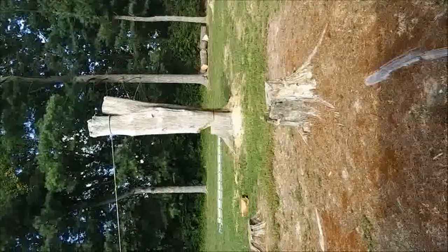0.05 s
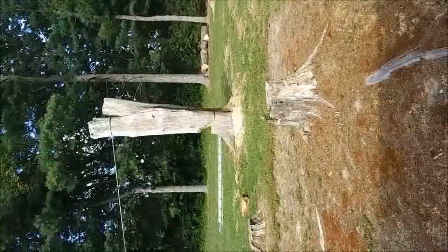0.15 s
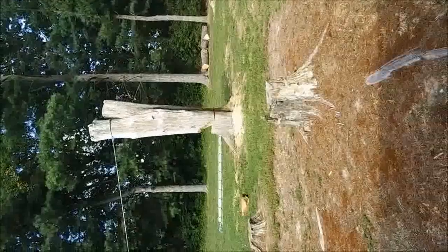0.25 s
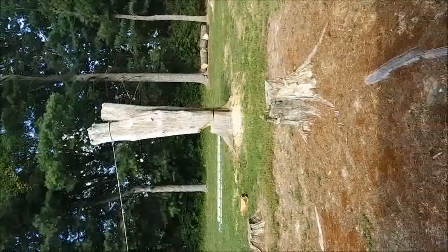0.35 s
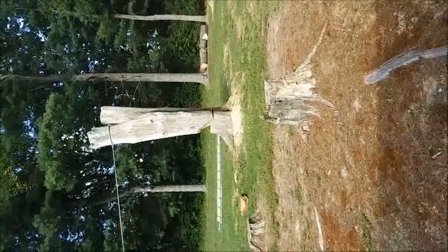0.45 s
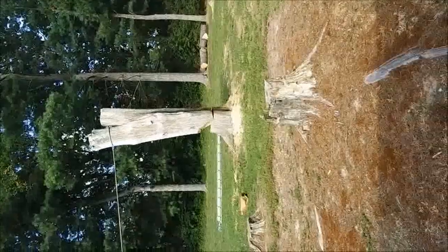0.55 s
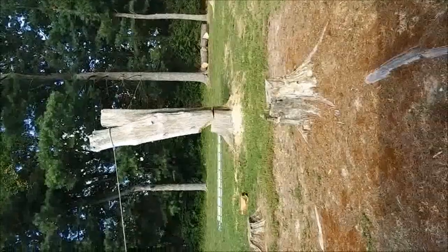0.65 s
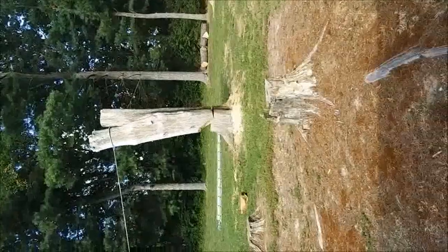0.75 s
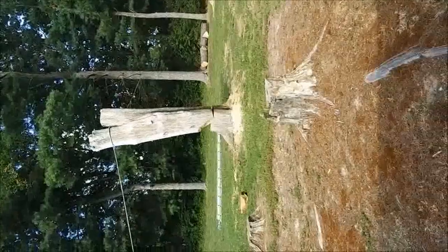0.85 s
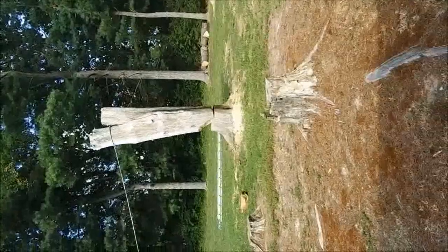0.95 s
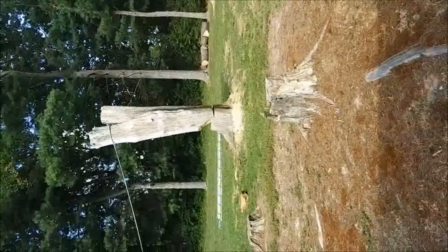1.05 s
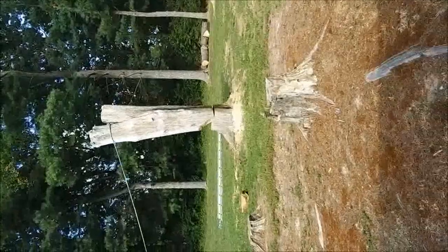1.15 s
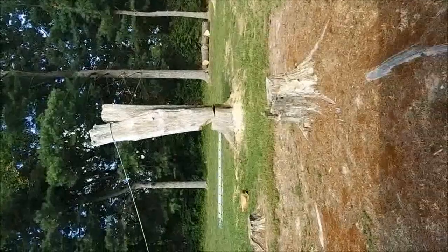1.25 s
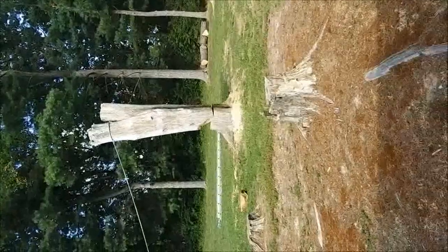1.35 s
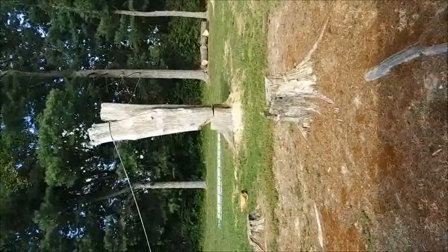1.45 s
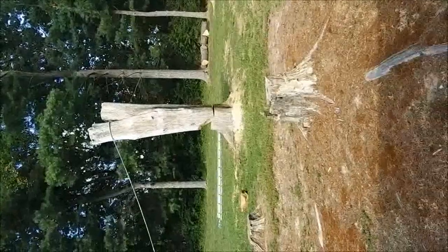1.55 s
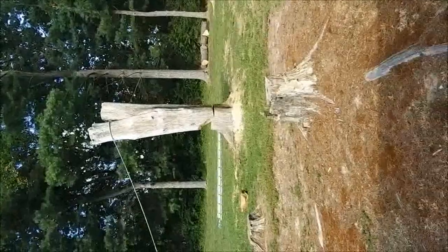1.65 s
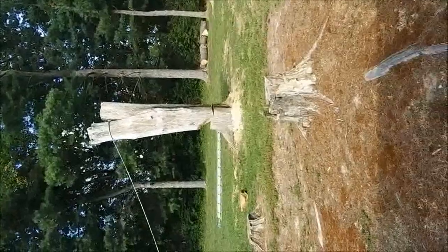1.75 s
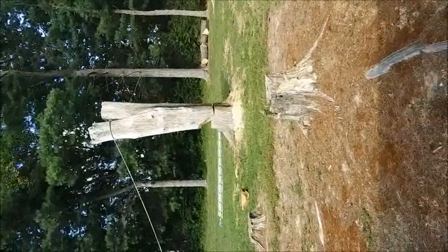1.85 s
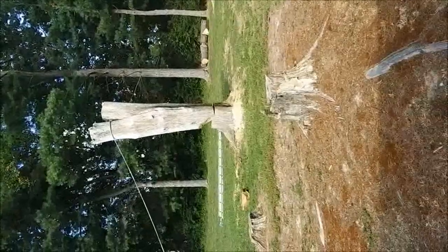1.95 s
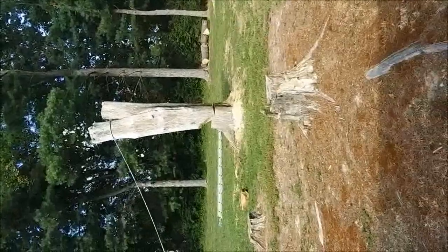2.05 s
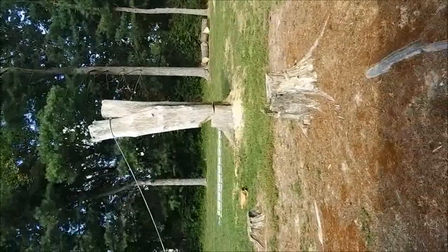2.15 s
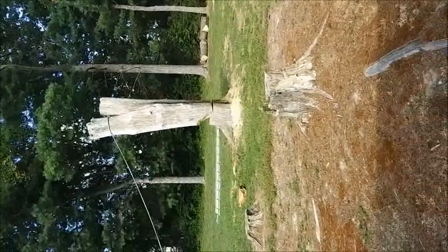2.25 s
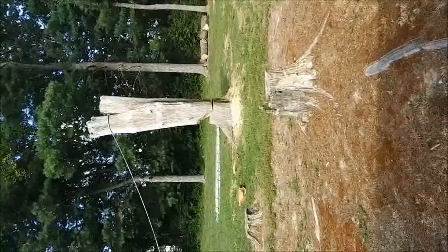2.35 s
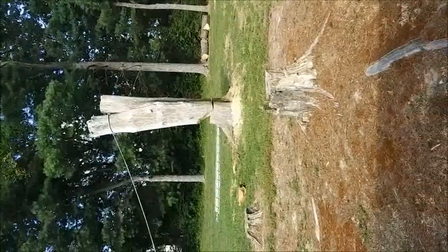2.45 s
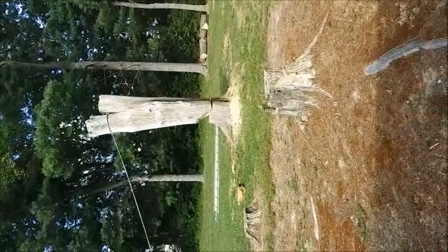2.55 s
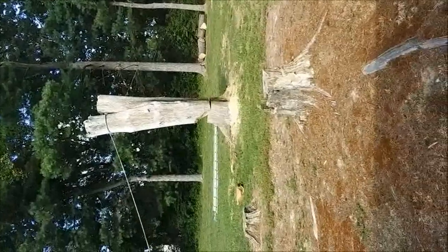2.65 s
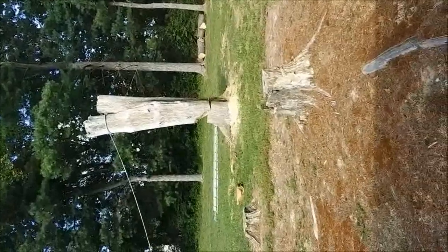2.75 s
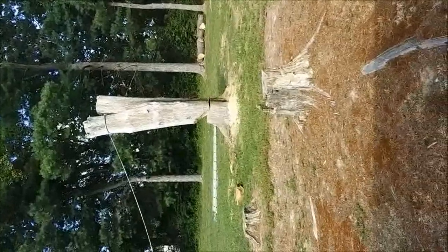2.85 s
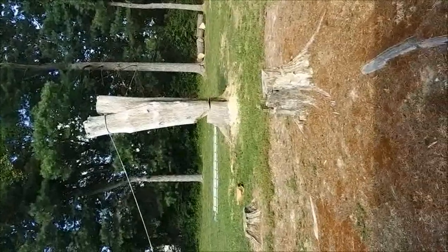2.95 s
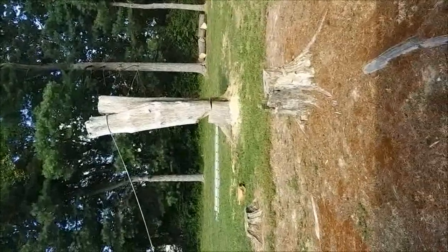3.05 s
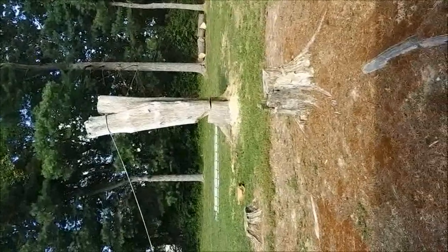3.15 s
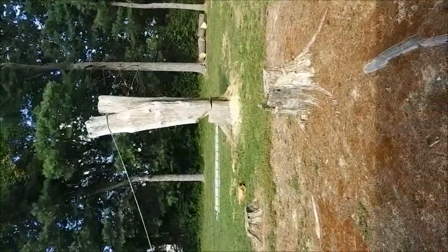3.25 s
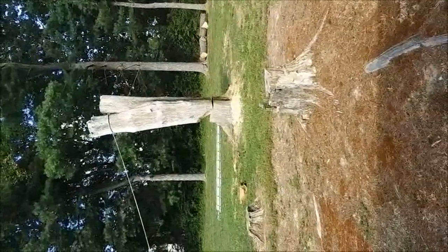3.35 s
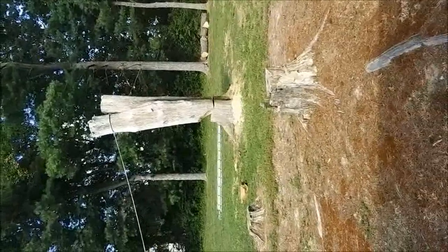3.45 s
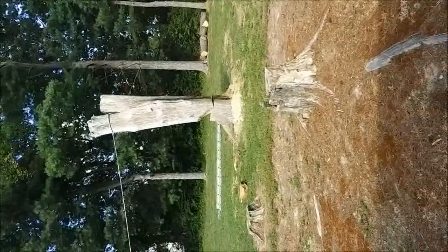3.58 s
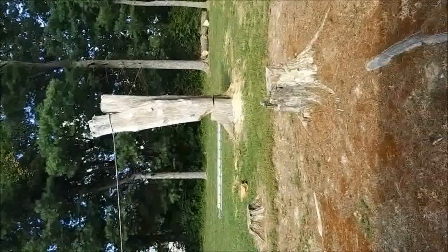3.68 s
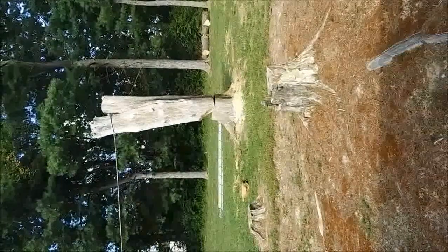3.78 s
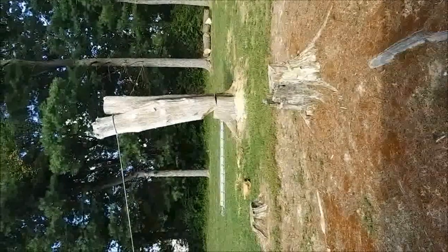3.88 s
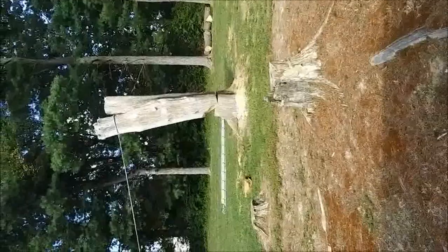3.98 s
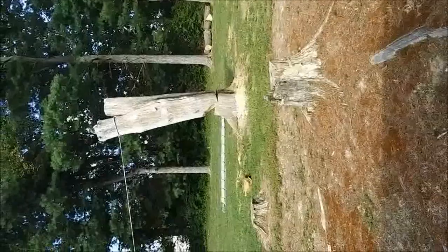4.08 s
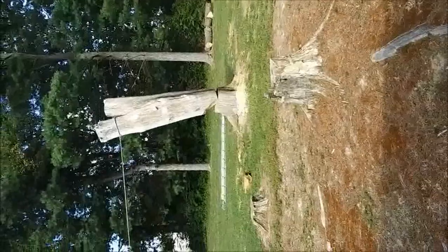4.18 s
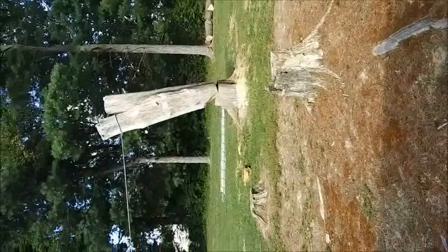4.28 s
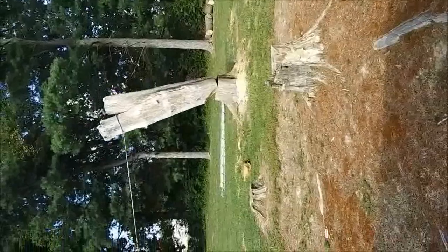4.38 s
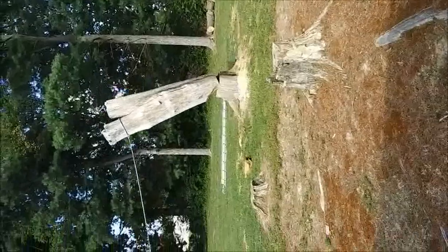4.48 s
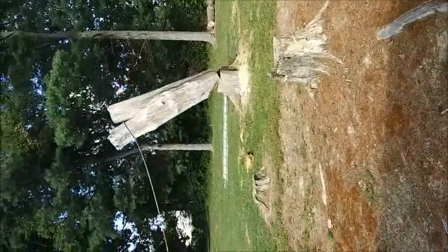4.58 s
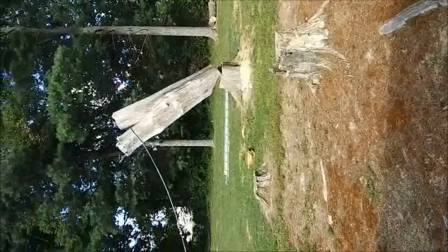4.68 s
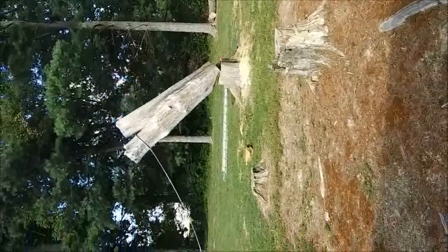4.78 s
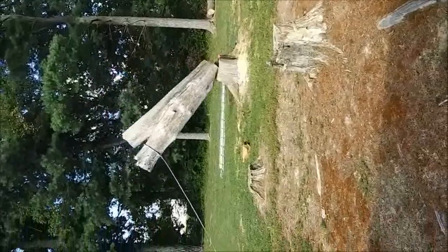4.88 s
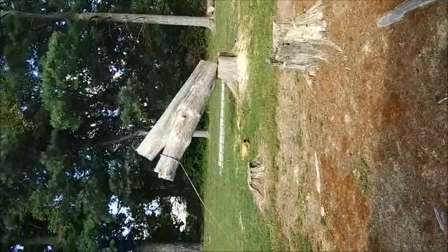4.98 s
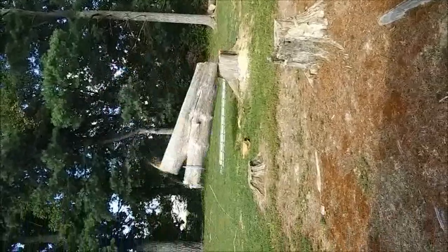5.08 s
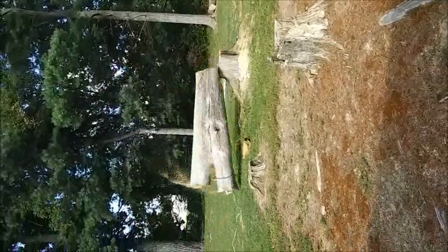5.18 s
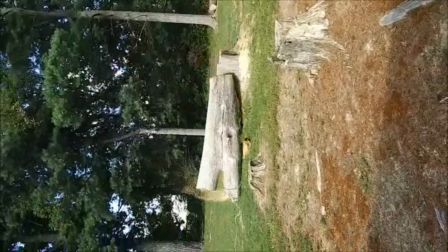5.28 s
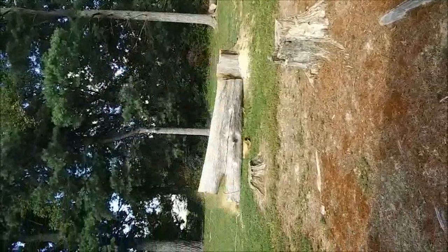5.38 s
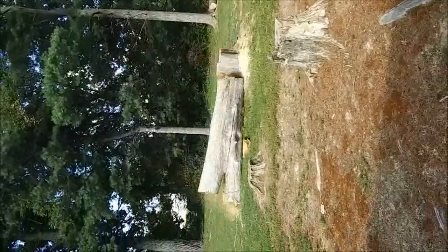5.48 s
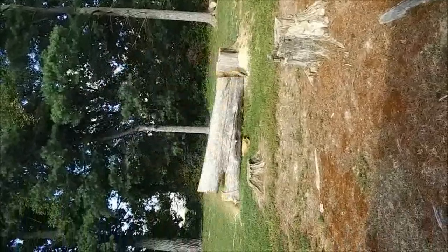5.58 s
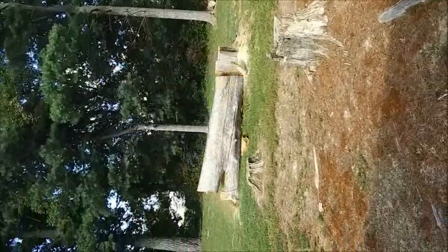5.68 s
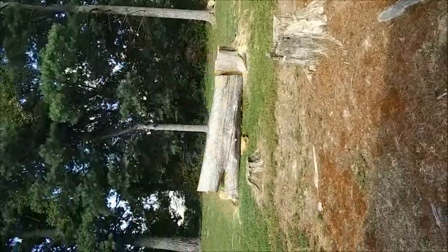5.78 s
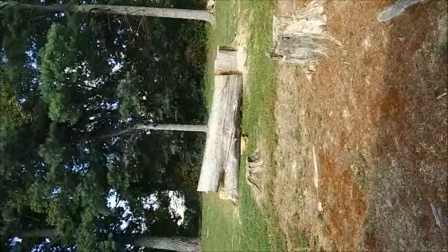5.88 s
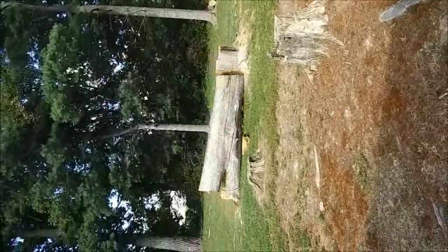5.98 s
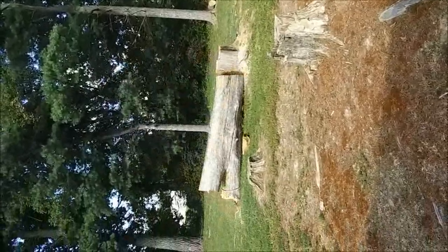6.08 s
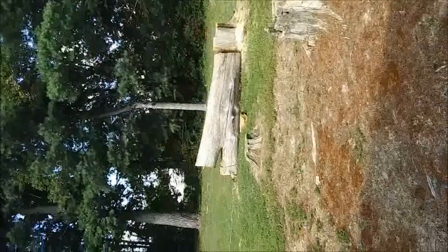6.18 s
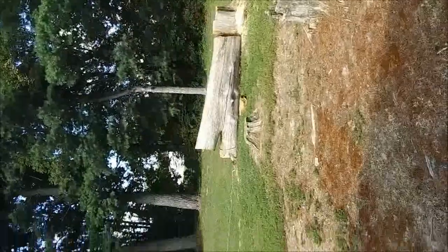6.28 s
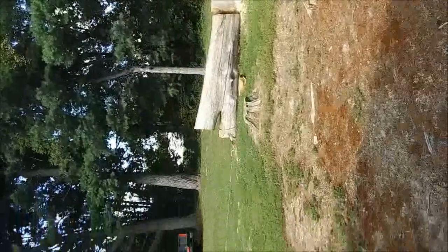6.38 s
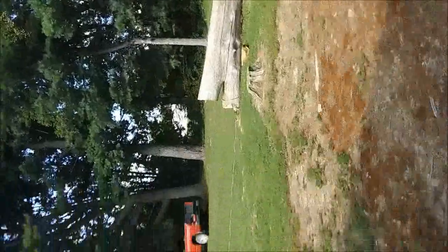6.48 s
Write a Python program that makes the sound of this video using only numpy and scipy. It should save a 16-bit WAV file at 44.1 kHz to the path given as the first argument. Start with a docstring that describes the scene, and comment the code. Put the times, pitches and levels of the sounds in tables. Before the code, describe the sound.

Faint ticks, a few sharp wood cracks, a pause, then a rapid run of splintering snaps as a trunk topples and thuds onto soil, echoing among trees.

```python
"""Hinge wood of a falling trunk

A topped trunk, cut at its foot and pulled by a rope, tears its hinge: ticks, a few loud cracks, a pause,
then a run of splintering snaps as it topples and lands with two main thuds among weaker contacts.
Breaks are short pulses and noise bursts that excite damped trunk modes; each thud rings the log and
crushes soil. Ground and trees echo them by filtered noise; engine, leaves and insects are shaped noise."""
import sys
import numpy as np
from scipy import signal
from scipy.fft import rfft, irfft, next_fast_len
from scipy.io import wavfile
from scipy.ndimage import uniform_filter1d, minimum_filter1d, map_coordinates

SR = 44100
rng = np.random.default_rng(int(sys.argv[2]) if len(sys.argv) > 2 else 0)


def unload_audio(sound):
    """Save the sound as a 16-bit wav file, at the path given as the first command line argument."""
    columns = np.transpose(np.atleast_2d(sound))
    # keep every value between -1 and 1, then stretch to whole-number steps
    steps = np.round(np.clip(columns, -1, 1) * 32767)
    wavfile.write(sys.argv[1], SR, steps.astype(np.int16))


N = 287973

# Splintering of small fibres and debris. Each row: time in seconds, relative level in dB.
SPLINTERING = [(3.8, -62), (4.0, -63.5), (4.11, -46.5), (4.24, -52), (4.3, -50.5), (4.67, -50.5),
               (4.94, -45), (5.37, -56), (5.65, -86)]
MIDDLE_HZ = 2800  # middle snap pitch


def amp(db):
    """Level law: decibels to amplitude gain."""
    return 10 ** (np.asarray(db) / 20)


def unit(x):
    """Power normalization: scales a signal to rms 1."""
    return x / np.sqrt(np.mean(x ** 2) + 1e-20)


def along(points, hz, axis=1):
    """Logarithmic frequency scale: interpolates one column of a table whose first column is in Hz."""
    cols = np.transpose(points)
    return np.interp(np.log(hz + 1), np.log(cols[0] + 1), cols[axis])


def curves(rows):
    """Level envelopes: one value per sample for each column after the time."""
    s, *cols = np.transpose(rows)
    t = np.arange(N) / SR
    late_start = s[0] > 1  # such a curve is at -120 dB outside its times
    return [np.interp(t, s, c, left=-120 if late_start else c[0], right=-120 if late_start else c[-1])
            for c in cols]


def wobble(rate):
    """Slow random modulation: a smooth curve through `rate` random knots a second."""
    knots = rng.standard_normal(int(N * rate / SR) + 4)
    return map_coordinates(knots, [np.arange(N) * rate / SR])


def filtered(x, response):
    """Linear filtering: multiplies the spectrum by a complex response of frequency."""
    m = next_fast_len(len(x) + 8192)
    return irfft(rfft(x, m) * response(np.fft.rfftfreq(m, 1 / SR)), m)[:len(x)]


def peak(hz, width_hz):
    """Simple resonator: the causal response of a damped oscillator, with gain 1 at its centre."""
    return lambda f: 1j * f * width_hz / (hz * hz - f * f + 1j * f * width_hz)


def ring(modes, t, rise, spread_db):
    """Modal superposition: damped sines, with new strengths and slightly new pitches for each blow."""
    total = 0
    for hz, db, t60 in modes:
        decay = amp(db + rng.normal(0, spread_db) - 60 * t / t60)
        total = total + decay * np.sin(2 * np.pi * hz * rng.normal(1, 0.025) * t)
    return (1 - np.exp(-t / rise)) * total


def add(track, s, sound):
    """Linear superposition: adds a sound to the track at time s."""
    track[round(s * SR):][:len(sound)] += sound


def rush(spectrum, patchy_db):
    """Coloured noise: rms 1, with random gain in patches of time and frequency."""
    z = signal.stft(rng.standard_normal(N), nperseg=512)[2]
    over_frequency = uniform_filter1d(rng.standard_normal(z.shape), 6, 0)
    field = uniform_filter1d(over_frequency, 14, 1)
    noise = signal.istft(z * amp(patchy_db * unit(field)), nperseg=512)[1][:N]
    return unit(filtered(noise, lambda hz: amp(along(spectrum, hz))))


def engine():
    """Broadband drone: low coloured noise under a slowly wavering level."""
    # Each row: time in seconds, mean level in dB.
    engine_level = [(0, -53), (1.3, -51), (2.8, -51.5), (3.7, -46.5), (5.7, -48), (6.53, -50.5)]
    # Each row: frequency in Hz, relative spectrum level in dB.
    drone_spectrum = [(15, -58), (25, -33), (64, -8.5), (80, -2), (102, -4), (168, -1), (274, -2),
                      (500, -29), (650, -43), (1100, -120)]
    level_db = curves(engine_level)[0] + .6 * wobble(9)
    return amp(level_db) * rush(drone_spectrum, patchy_db=.6)


def leaves(level_db):
    """Incoherent rustle: patchy coloured noise under a slowly wavering level."""
    # Each row: frequency in Hz, relative spectrum level in dB.
    rustle_spectrum = [(210, -46), (350, -2.5), (568, -2), (2030, 0), (3240, -5), (4850, -18.5),
                       (7990, -21), (9690, -29), (15200, -31), (16500, -28)]
    return amp(level_db + 1.1 * wobble(6.5)) * rush(rustle_spectrum, patchy_db=1.55)


def insects(level_db):
    """Narrow-band noise: a resonant chorus, and one insect that chirps above it in pitch."""
    # Each row: centre in Hz, width in Hz of each of two cascaded resonances, relative gain in dB.
    chorus_bands = [(6400, 500, 3), (6910, 470, 6), (7830, 520, 8), (8140, 570, 3)]
    # Each row: centre time in seconds, half length in seconds (to 1/e), level in dB.
    chirp_times = [(0.297, .1, -78), (1.234, .09, -67), (2.2, 0.1, -72), (3.42, .11, -71),
                   (5.85, 0.035, -66.5), (6.178, .04, -69)]
    t = np.arange(N) / SR
    chorus = filtered(rng.standard_normal(N),
                      lambda f: sum(amp(db) * peak(c, w)(f) ** 2 for c, w, db in chorus_bands))
    envelope = sum(amp(db) * np.exp(-((t - s) / half) ** 4) for s, half, db in chirp_times)
    solo = unit(filtered(rng.standard_normal(N), lambda f: peak(8750, 450)(f) ** 2))
    return amp(level_db + 0.57 * wobble(20.0)) * unit(chorus) + envelope * solo


def background():
    """Incoherent addition: independent engine, leaf and insect noises."""
    # Each row: time in seconds, mean rustle level in dB, mean insect chorus level in dB.
    air_levels = [(0, -51, -65), (.6, -51.5, -65.5), (2, -50.5, -66.5), (3, -50.5, -69.5),
                  (3.8, -50.5, -64.5), (5.8, -50.2, -63.5), (6.15, -50.5, -66), (6.53, -54.5, -66)]
    rustle_db, insects_db = curves(air_levels)
    return engine() + leaves(rustle_db) + insects(insects_db)


def ground(x):
    """Diffuse reflection: the ground returns a blurred, duller, weaker copy a few milliseconds late."""
    t = np.arange(200) / SR
    blur = np.exp(-t / 0.0022) * rng.standard_normal(len(t)) + 6 * (t == 0)
    delayed = np.pad(x, (round(.0053 * SR), 0))
    late = np.convolve(delayed, blur / np.linalg.norm(blur))[:N]
    return amp(-13.5) * filtered(late, lambda f: 1 / (1 + 1j * f / 7000))


def trees(x):
    """Multiple scattering: a noise tail starts at once, swells after about 20 ms, and decays by band."""
    # Each row: frequency in Hz, t60 in seconds, relative level in dB.
    echo_bands = [(150, 1, -1), (500, 0.58, 6.5), (1210, 1, -2), (2200, 0.9, -5.5), (3500, 0.86, -8.5),
                  (4950, 0.65, -8), (8500, 0.87, -7.5), (15000, 0.47, -16)]
    out, hop = np.zeros(N + 2 * SR), round(.1 * SR)
    for i in range(round(.5 * SR), round(5.8 * SR), hop):  # a new random tail for each 0.1 s of sound
        hz, t, z = signal.stft(rng.standard_normal(SR), SR, nperseg=256)
        arrival = 0.48 + np.clip((t - .02) / 0.011, 0, 1)
        level_db = along(echo_bands, hz, axis=2)[:, None]
        shape = amp(level_db - 60 * t / along(echo_bands, hz)[:, None]) * arrival
        tail = signal.istft(z * shape, SR, nperseg=256)[1]
        add(out, i / SR, signal.fftconvolve(x[i:i + hop], tail / np.sqrt(SR)))
    return out[:N]


def thuds():
    """Impact excitation: soft heavy contacts run along the log, ring its modes and crush soil and bark."""
    # Log meeting stump and soil. Each row: start in seconds, push in dB, soil crunch in dB,
    # number of contacts along the log.
    landings = [(5.131, -31.5, -23.5, 2), (5.227, -32, -36.5, 1), (5.354, -14.5, -26.5, 4),
                (5.408, -25.5, -45, 1), (5.434, -13, -20.5, 3), (5.515, -33, -34, 1),
                (5.577, -26.5, -39, 1)]
    # Modes of the log on soil. Each row: mean frequency in Hz, mean level in dB, t60 in seconds.
    log_modes = [(62, -15, 0.3), (128, -15, 0.083), (184.6, 4, 0.12), (252, 6.5, 0.082), (399, 7, 0.04),
                 (617, 6, 0.025), (825, 4, 0.017)]
    roll_s, roll_loss_db = .0095, 2.1  # delay and loss from contact to contact
    contact_s, crush_lag_s = 0.0033, 0.0034  # rise of one contact; soil and bark give way just after it
    lumpy_db = 4
    body, crunch, t = np.zeros(N + SR), np.zeros(N + SR), np.arange(SR // 3) / SR
    for first, push_db, crunch_db, contacts in landings:
        for k in range(round(contacts)):
            s, loss_db = first + k * roll_s, k * roll_loss_db
            add(body, s, amp(push_db - loss_db) * ring(log_modes, t, contact_s, 2.0))
            grit = filtered(rng.standard_normal(len(t)),
                            lambda f: peak(2400, 3200)(f) + 0.16 * peak(8800, 5000)(f))
            lumps_db = lumpy_db * unit(uniform_filter1d(rng.standard_normal(len(t)), size=60))
            decay = amp(crunch_db - loss_db + lumps_db - 60 * t / 0.075)
            add(crunch, s + crush_lag_s, decay * (1 - np.exp(-t / 0.0029)) * unit(grit))
    return crunch[:N], body[:N]


def splinters():
    """Granular noise: over a thousand tiny fibre snaps a second, a few of them much louder."""
    count, length = 2400, 160  # grains; samples in each
    u = rng.random((count, 2))
    loudness, pitch = rng.exponential(size=count), rng.standard_normal(count)
    hz = np.clip(2700 * np.exp(0.32 * pitch), 600, 12000)[:, None]
    t = np.arange(length) / SR
    decay = amp(2.2 * loudness)[:, None] * np.exp(-t * hz / 1.2)
    grains = decay * np.sin(2 * np.pi * (hz * t + u[:, 1:]))
    at = ((3.8 + 2.1 * u[:, :1]) * SR).astype(int) + np.arange(length)  # from 3.8 s, over 2.1 s
    x = np.bincount(at.ravel(), grains.ravel(), N)[:N]
    return amp(curves(SPLINTERING)[0]) * unit(x)


def lesser_breaks(count):
    """Random fracture: lesser fibres part while the trunk falls and settles, following the splintering."""
    s, g = rng.uniform(4.0, 5.6, count), rng.standard_normal((count, 4))
    snap_db = np.interp(s, *np.transpose(SPLINTERING)) + 14.5 + 2 * g[:, 0]
    hz = MIDDLE_HZ * np.exp(0.23 * g[:, 1])
    sizzle_db = snap_db - 1 + 6 * g[:, 2]
    knock_db = snap_db - 16.5 + 5 * g[:, 3]
    return list(zip(s, snap_db, hz, sizzle_db, knock_db))


def fibre_snap(t, hz, snap_db, tear):
    """Stress release: a pulse of a few cycles, slower in a weak fibre, and a brief noisy shudder."""
    grip_s = (0.62 + 0.0376 * max(-snap_db, 0)) / hz  # time to the peak, set in cycles of the pitch
    pulse = t / grip_s * np.exp(1 - t / grip_s)
    ragged = unit(filtered(tear, lambda f: peak(hz, 1.2 * hz)(f) ** 2))
    snap = pulse * (np.sin(2 * np.pi * hz * t) + 0.69 * ragged)
    rattle = unit(filtered(rng.standard_normal(len(t)), lambda f: peak(.85 * hz, 1.2 * hz)(f) ** 2))
    shudder = amp(-18 - 60 * t / .03) * (1 - np.exp(-t / .0007)) * rattle
    return snap + shudder


def fibre_sizzle(t):
    """High-frequency transient: a sharp tick near 9 kHz over a decaying bright hiss."""
    bright = unit(filtered(rng.standard_normal(len(t)), lambda f: peak(9000, 9000)(f) ** 2))
    pulse = t / .0001 * np.exp(1 - t / .0001)
    tick = pulse * np.sin(2 * np.pi * rng.normal(9000, 900) * t)
    return tick + bright * amp(-12.0 - 60 * t / 0.0092)


def cracks():
    """Impulsive excitation: each break snaps, sizzles and knocks the trunk, whose bending builds more slowly."""
    # Clear breaks of fibre; the rows from 5.1 s on are sharp cracks of the log as it lands. Each row: start in
    # seconds, snap in dB, snap pitch in Hz, sizzle in dB, # knock on the trunk in dB.
    clear_breaks = [(0.0179, -38, 2420, -50, -49), (0.0336, -42, 2570, -40, -56),
                    (0.051, -39, 2650, -47, -52), (0.0678, -38, 2250, -39, -45),
                    (0.1007, -38, 2320, -36, -59), (.121, -40, 2640, -37, -58),
                    (.161, -40.5, 2020, -36, -45), (0.1968, -37.5, 2750, -32, -44),
                    (.2464, -33, 2240, -27.5, -48), (0.329, -33, 2080, -27.5, -48),
                    (.3731, -32, 2280, -24, -41), (0.425, -38.5, 2600, -33, -59),
                    (.6004, 0.5, 2000, -40, -8.5), (0.6398, -28, 2790, -29, -32),
                    (0.6483, -2.5, 3500, -8, -25.5), (.6994, -24, 2300, -43, -34),
                    (0.7491, -2.5, 1920, -17, -8.5), (0.7667, 0.9, 2430, 2, -13.5),
                    (.886, -27, 1970, -33, -36.5), (.9261, -31, 2630, -43, -40),
                    (1.0235, -34, 2200, -55, -53), (1.0496, -41.5, 2960, -72, -52),
                    (3.949, -30.5, 1450, -52, -34), (3.9645, -34, 2000, -25.5, -37),
                    (4.0123, -36, 1780, -32, -34), (4.0634, -2.5, 2330, -12, -9),
                    (4.0848, -14.5, 3070, -4, -25), (4.1102, -12.5, 2470, -13.5, -44),
                    (4.1207, -21, 2320, -30, -23), (4.1937, -9.5, 2730, -10.5, -30),
                    (4.2372, -29, 2840, -12.5, -33), (4.2484, -1.5, 2300, -32, -8.5),
                    (4.2801, -11.5, 2300, -28, -20.5), (4.2906, -22, 3250, -7.5, -36),
                    (4.3166, 8.5, 3440, 1.2, -22), (4.3425, -22, 2800, -23, -47),
                    (4.3484, -16, 2720, -27, -49), (4.3691, -19, 2730, -38, -41),
                    (4.3745, -16.5, 3430, -2.5, -45), (4.413, -18, 2240, -38, -32),
                    (4.4302, -22, 2500, -16, -40), (4.4524, -12.5, 2800, -11, -36),
                    (4.48, -20, 2800, -8, -38), (4.4921, -0.6, 2750, -3, -16.5),
                    (4.5177, -24, 3065, -22, -36), (4.553, -3.8, 3330, -4.5, -27),
                    (4.5943, -22, 2840, -25, -50), (4.6557, -4.5, 3670, -5, -25),
                    (4.6923, -10, 3300, -14, -42), (4.7405, -14, 3010, -50.5, -50),
                    (4.7499, -17.5, 3200, -21.5, -30.5), (4.7724, -20, 2460, -23, -27.5),
                    (4.8071, -25, 3200, -20, -49), (4.8208, -17.5, 3640, -22, -31),
                    (4.8317, -19, 2500, -27, -42), (4.8421, -5.5, 2480, -19, -30.5),
                    (4.8745, -21, 2420, -30, -43), (4.8869, -16, 3160, -22, -39),
                    (4.901, -19.5, 3520, -31, -39), (4.9515, -13.5, 3250, -47, -22),
                    (4.9728, -25.5, 3280, -38, -47), (5.1186, -26, 2800, -40, -43),
                    (5.1368, -6.5, 3590, -24, -38), (5.1386, -11, 3420, -33, -19.5),
                    (5.1512, 0.5, 3160, -18, -21.5), (5.3603, -4, 2660, 7.5, -13),
                    (5.3676, -6.5, 1950, -17, -13), (5.378, -1.5, 2400, -28, -16),
                    (5.443, -9, 2810, -16, -18.5), (5.517, -24.5, 2260, -46, -35)]
    # Trunk modes, then slow bending modes. Each row: mean frequency in Hz, mean level in dB, t60 in seconds.
    knock_modes = [(409, -9, 0.058), (662.6, -2.5, 0.035), (892, -10.5, 0.054), (1251, 1, 0.029),
                   (1451, 8, 0.016)]
    bending_modes = [(160.7, -6.5, 0.078), (200.3, 4.5, 0.098), (251, -5, 0.077)]
    hinge_gone_s, loose_db = 4.45, -3.5  # with most of the hinge torn the trunk bends less
    snaps, wood, spread = np.zeros((3, N + SR))
    t = np.arange(SR // 4) / SR
    short = t[:SR // 30]
    for s, snap_db, hz, sizzle_db, knock_db in clear_breaks + lesser_breaks(count=90):
        # thin, high fibres knock less than they bend
        boom_db = knock_db - 4 + 10 * np.log2(hz / MIDDLE_HZ) + loose_db * (s > hinge_gone_s)
        tear = rng.standard_normal(len(short))
        snap = amp(snap_db) * fibre_snap(short, hz, snap_db, tear)
        add(snaps, s, snap + amp(sizzle_db) * fibre_sizzle(short))
        # summed over all directions the break has no one pitch
        broad = unit(filtered(tear, lambda f: peak(2200, 4000)(f) + .15 * peak(11000, 9000)(f)))
        add(spread, s, amp(snap_db - 60 * short / 0.011) * broad)
        knock = amp(knock_db) * ring(knock_modes, t, 0.0022, spread_db=2.5)
        boom = amp(boom_db) * ring(bending_modes, t, 0.0096, spread_db=7.0)
        add(wood, s, knock + boom)
    return snaps[:N], wood[:N], spread[:N]


def scene():
    """Superposition of direct and reflected sound: the tree, its echoes and the woods."""
    # Colour of the tree's sharp sound as it arrives. Each row: frequency in Hz, gain in dB.
    arrival_colour = [(1000, -0.5), (3800, 2.5), (5000, -5.5), (6200, -5.5), (8500, -2), (10500, -7.5),
                      (13000, -12.5), (16000, -23)]

    def coloured(x):
        """Spectral weighting: applies the arrival colour."""
        return filtered(x, lambda hz: amp(along(arrival_colour, hz)))

    snaps, wood, spread = cracks()
    crunch, body = thuds()
    sharp = coloured(snaps + crunch + splinters())
    low = wood + body
    echo = trees(amp(-2) * sharp + amp(-6) * coloured(spread) + amp(-9) * low)
    return (sharp + low + ground(sharp) + echo + background())[None]


def record(dry):
    """Peak limiting and band limiting: the gain drops around loud peaks, then the top is cut at 16.7 kHz."""
    need = np.minimum(1, .95 / (np.abs(dry[0]) + 1e-9))
    gain = uniform_filter1d(minimum_filter1d(need, size=129), size=65)
    return filtered(dry[0] * gain, lambda hz: hz < 16700)[None]


dry = scene()
out = record(dry)
unload_audio(out)
```